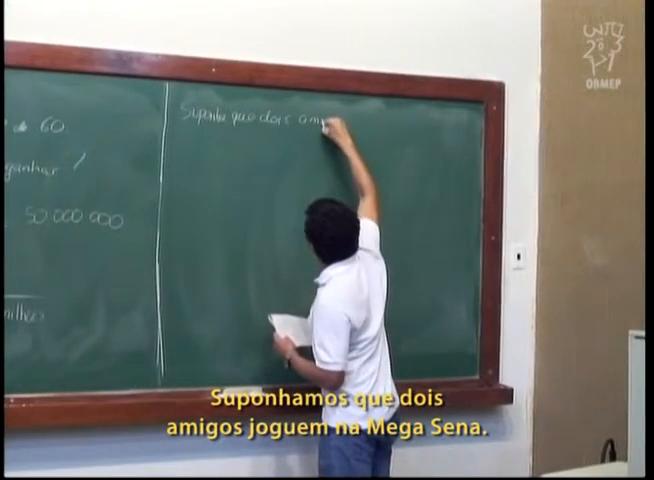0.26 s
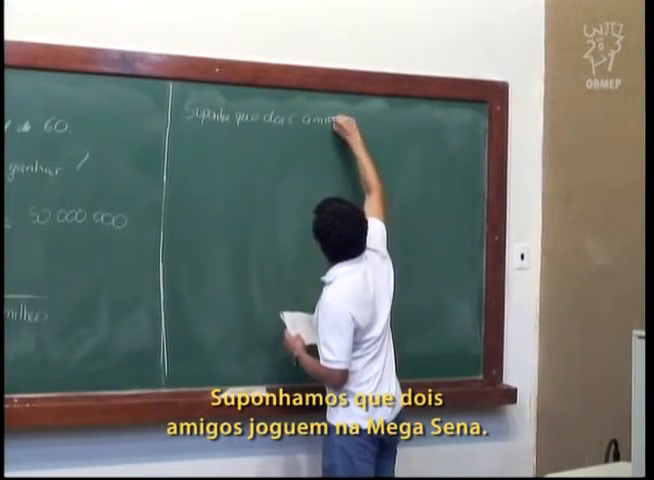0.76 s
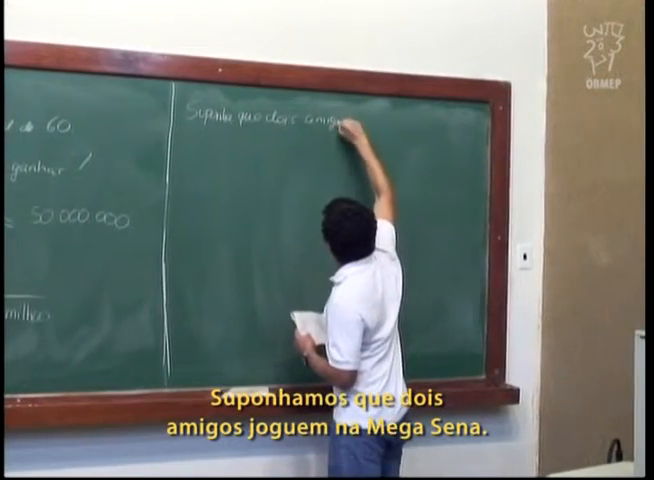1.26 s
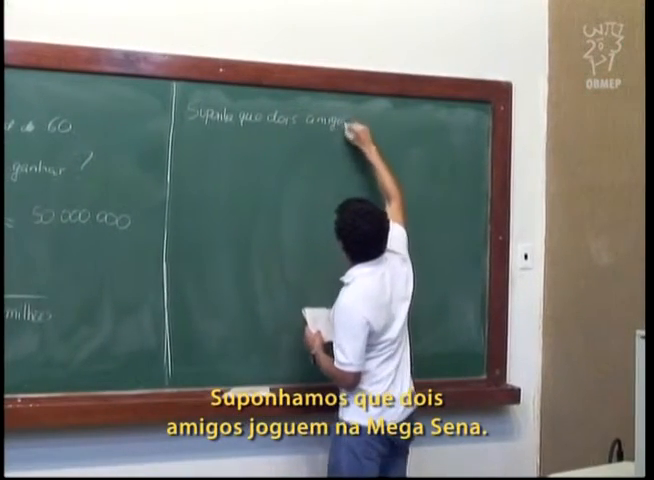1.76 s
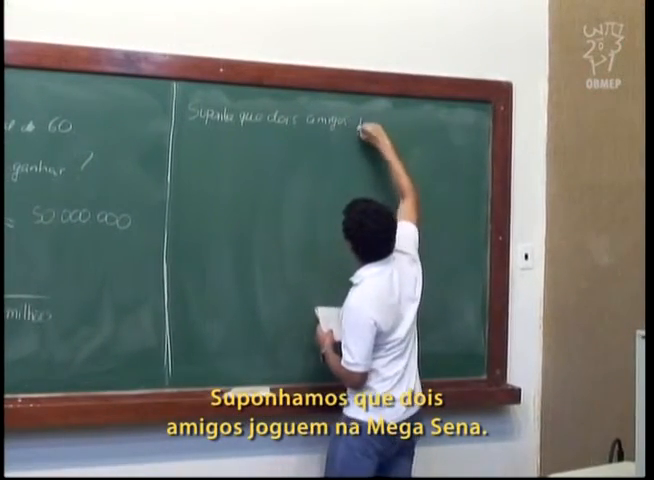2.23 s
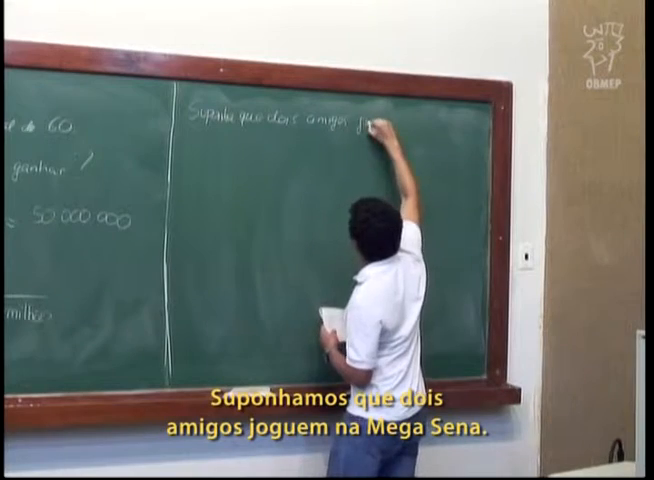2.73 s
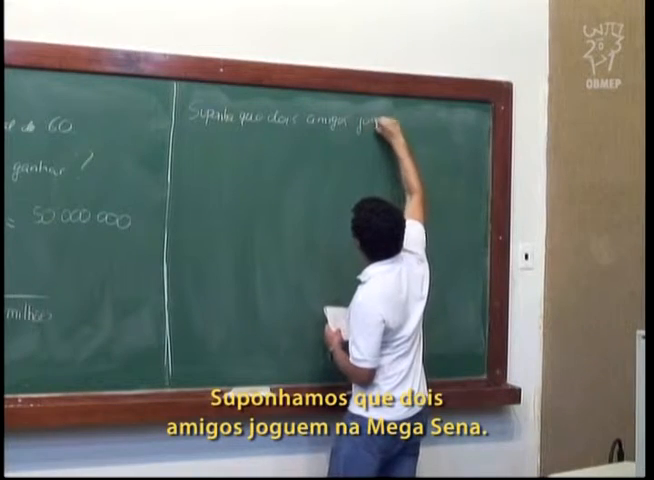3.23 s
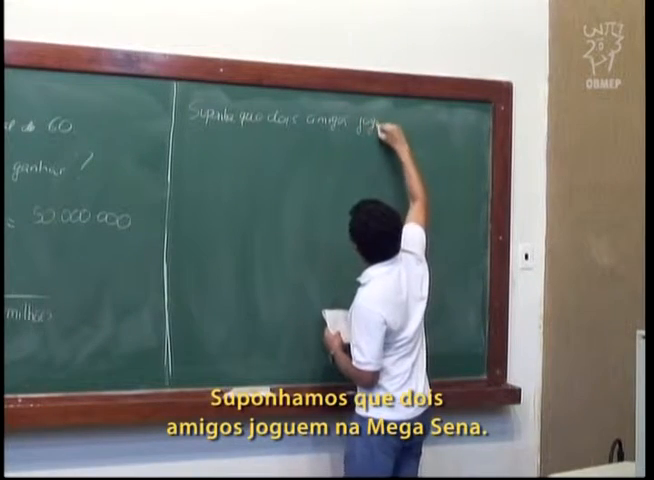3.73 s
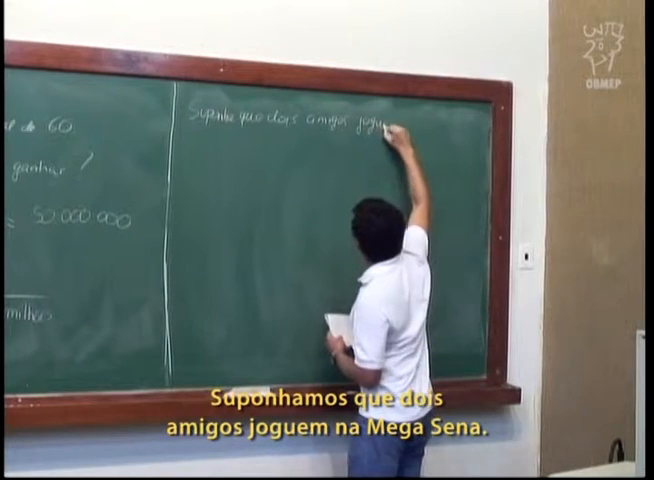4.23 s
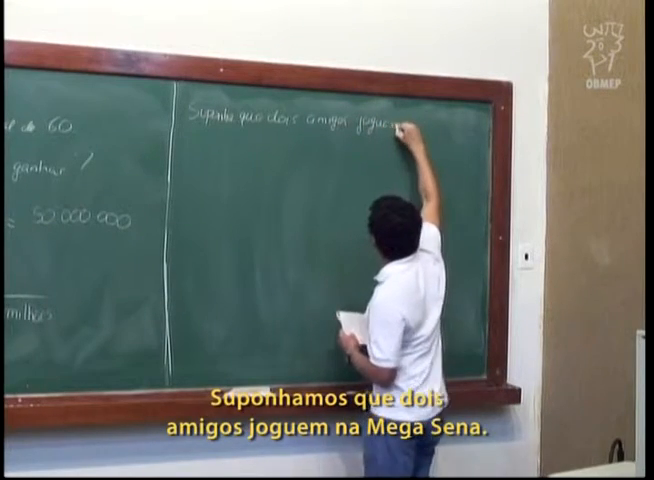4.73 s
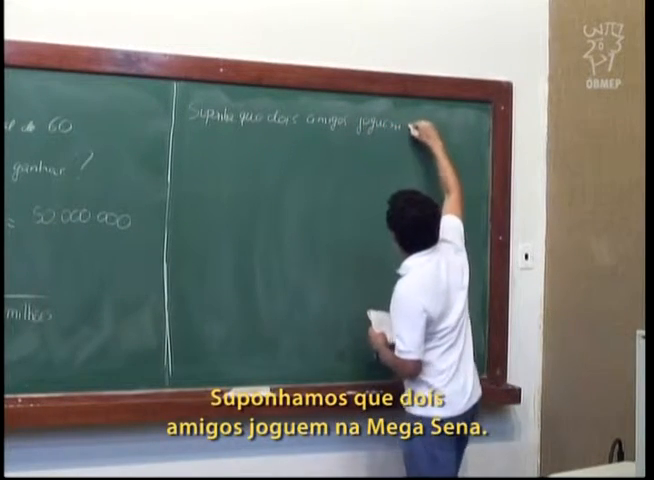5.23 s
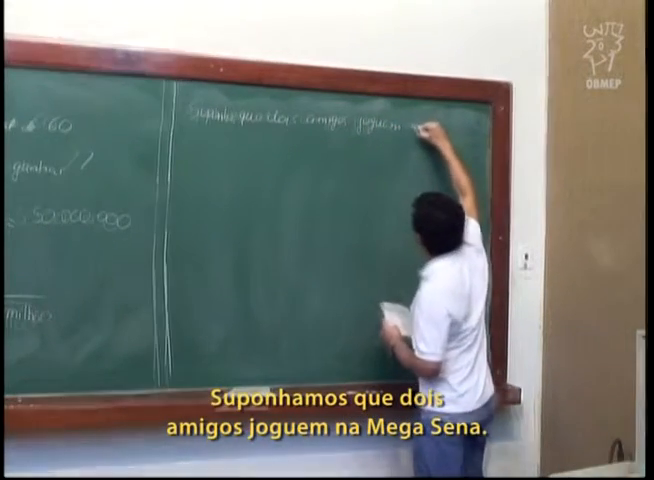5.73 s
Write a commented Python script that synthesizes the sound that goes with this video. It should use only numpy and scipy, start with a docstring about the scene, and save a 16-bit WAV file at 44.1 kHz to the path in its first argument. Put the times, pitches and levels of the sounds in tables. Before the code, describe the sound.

Chalk writes on a chalkboard for about six seconds in a quiet classroom, heard from a microphone facing the board. Dry, clicking taps mark the chalk landing, with faint gritty strokes between them. Two taps come at about 0.2 and 0.4 seconds, followed by a much softer one, then others near 1.2, 1.6 and 2 seconds. Brief scuffs sound around 1.1, 1.4 and 2.3 seconds as the chalk catches. The strongest tap lands at 2.4 seconds, with more at 2.6, 3 and 3.7. A scuff and three lighter taps fall between 4 and 4.5 seconds. Soft scraping continues to the end, broken by a duller knock at 5.3 seconds. A short room echo follows the writing. Underneath, a low building rumble, soft hiss, electrical hum and a very faint high whine stay steady throughout.

```python
"""A quiet classroom, the microphone facing a wall-mounted chalkboard. From the start there is the low
rumble of the building, hiss, mains hum and the thin whine of video equipment. Someone writes a few
words: each letter opens with a dry tap as the chalk rings the board, goes on in faint gritty sweeps
of the hand and often ends in a scuff as the chalk catches. The room echoes briefly behind them."""
import sys
import numpy as np
from scipy import signal
from scipy.fft import rfft, irfft, next_fast_len
from scipy.io import wavfile
from scipy.ndimage import uniform_filter1d

SR = 44100
rng = np.random.default_rng(int(sys.argv[2]) if len(sys.argv) > 2 else 0)


def inscribe(sig):
    """Save sig as 16-bit PCM at rate SR to the path in sys.argv[1].

    A 1-D sig is mono; a 2-D sig holds one channel per row.
    Samples are clipped to [-1, 1] before scaling.
    """
    pcm = np.round(np.clip(np.atleast_2d(sig).T, -1, 1) * 32767)
    wavfile.write(sys.argv[1], SR, pcm.astype(np.int16))


N = 264159
TIME = np.arange(N) / SR


def amp(db):
    """Decibels to gain."""
    return 10 ** (np.asarray(db) / 20)


def unit(x):
    """Scales to rms 1."""
    return x / np.sqrt(np.mean(x ** 2) + 1e-20)


def read(table, hz, column=1):
    """One column of a table along a log-frequency axis."""
    columns = np.transpose(table)
    return np.interp(np.log(hz + 1), np.log(columns[0] + 1), columns[column])


def add(mix, s, sound):
    """Lays a sound into the mix at s seconds."""
    part = mix[max(round(s * SR), 0):][:len(sound)]
    part += sound[:len(part)]


def colour(x, spectrum):
    """Filters by a (Hz, dB) spectrum."""
    size = next_fast_len(2 * len(x))
    gain = amp(read(spectrum, np.fft.rfftfreq(size, 1 / SR)))
    return irfft(rfft(x, size) * gain, size)[:len(x)]


def wander(rate_hz):
    """A smooth random drift of rms 1 that changes up to about rate_hz times a second."""
    hz = np.fft.rfftfreq(N, 1 / SR)
    return unit(irfft(rfft(rng.standard_normal(N)) * np.exp(-(hz / rate_hz) ** 2), N))


def tone(hz, db):
    """A steady sine of the given rms level."""
    return amp(db) * np.sqrt(2) * np.sin(2 * np.pi * (hz * TIME + rng.random()))


# The building, heard from indoors. Each row: frequency in Hz, relative level in dB.
BUILDING_RUMBLE = [(15, -51), (25, -16), (37, -11), (46, -0.5), (62, 2.5), (75, 6.5), (90, 6), (103, 0.5),
                   (120, -1), (135, 0.5), (152, -5), (175, -16.5), (260, -64), (500, -56)]
# Still air and microphone hiss. Each row: frequency in Hz, relative level in dB.
AIR_HISS = [(100, -24), (170, 4.5), (250, -0.5), (430, -8), (585, -6.5), (820, -12.5), (1300, -16.5),
            (2000, -19.5), (3400, -24.5), (5500, -28), (10000, -30), (15000, -30.5)]
# The mains. Each row: frequency in Hz, rms level in dB.
MAINS_HUM = [(90.5, -62), (119.7, -56.5)]
def room_tone():
    """Swelling rumble, even hiss, hum, and a line-scan whine with side tones one field rate apart."""
    line_hz, field_hz = 15734.3, 60
    rumble = unit(colour(rng.standard_normal(N), BUILDING_RUMBLE))
    rumble *= amp(-50.5 + 1.5 * wander(rate_hz=6.2))
    hiss = amp(-54.5) * unit(colour(rng.standard_normal(N), AIR_HISS))
    hum = sum(tone(hz, db) for hz, db in MAINS_HUM)
    whine = tone(line_hz, db=-73.5) + sum(tone(line_hz - k * field_hz, db=-86) for k in range(1, 7))
    return rumble + hiss + hum + whine


def grit(grains_per_s, clump_db):
    """Chalk crumbles in tiny uneven grains; clump_db bunches them as the tip sticks and slips."""
    grains = rng.standard_normal(N) * (rng.random(N) < grains_per_s / SR)
    return unit(grains * amp(clump_db * wander(rate_hz=77)))


def tip_wear(x, patchy_db):
    """The tip's facets wear and turn, so patches of its colour come and go."""
    bands = signal.stft(x, nperseg=256)[2]
    patches = uniform_filter1d(rng.standard_normal(bands.shape), size=5, axis=0)
    patches = uniform_filter1d(patches, size=18, axis=1)
    return unit(signal.istft(bands * amp(patchy_db * unit(patches)))[1][:N])


# Sweeps of the hand between turns or lifts. Each row: start in seconds, length in seconds,
# level in dB, then grinding and powder in dB relative to that level.
HAND_SWEEPS = [(0.01, 0.135, -68.5, 2.5, -4), (0.24, 0.084, -68, 2, -3), (0.587, 0.094, -62, 3, -2.5),
               (0.675, 0.13, -68, 8, -1), (0.799, 0.12, -61.5, 3.5, -4), (0.915, 0.15, -69.5, 2.5, 1),
               (1.024, 0.047, -66, 6, 1), (1.202, 0.077, -63, 5, -4), (1.283, 0.12, -68.5, 10.5, 2),
               (1.393, 0.042, -67.5, 10, -6), (1.598, 0.1, -64, 8, -1), (1.681, 0.087, -68.5, 4, 3),
               (1.998, 0.18, -63, -2, 0), (2.162, 0.078, -66.5, 3.5, 7), (2.23, 0.087, -71.5, 9, 9),
               (2.615, 0.098, -65.5, 1, 0), (2.7, 0.16, -70, 5, 5), (3.035, 0.1, -66, 4, -4),
               (3.128, 0.12, -71, 8, 5), (3.27, 0.15, -63.5, -0.5, 2.5), (3.407, 0.17, -69, 6, 4),
               (3.69, 0.11, -64.5, -2, -3), (3.788, 0.094, -64, 5.5, 0), (3.923, 0.093, -65, 2, -2),
               (4.02, 0.048, -65, 2.5, 0), (4.173, 0.11, -63.5, 3, -3), (4.278, 0.064, -63.5, 3, 0),
               (4.396, 0.053, -65.5, 3, 0), (4.572, 0.085, -67, 2, 0), (4.668, 0.075, -66.5, 7, 3),
               (4.755, 0.099, -67.5, 3.5, -1), (4.854, 0.057, -64, 4, 0), (4.934, 0.19, -68.5, 5, 0),
               (5.313, 0.115, -67.5, 10, 3), (5.413, 0.1, -68, 4, 5), (5.526, 0.1, -70.5, 7.5, 6),
               (5.625, 0.096, -69, 3, 7), (5.72, 0.135, -70.5, 13.5, 6), (5.845, 0.13, -68.5, 3, 4.5)]
# The sliding contact's three voices: board, stick, powder. Each row: frequency in Hz, gain in dB.
BOARD_GRIND = [(300, -21), (700, 11), (900, 3), (1200, 14), (1700, 7.5), (2600, 6.5), (3600, 6), (4600, -1),
               (6200, -22), (8000, -10), (12000, -24)]
STICK_SING = [(4000, -11), (6600, 1), (7400, 10), (8000, 3.5), (8600, 5.5), (9600, 0), (11000, -14.5),
              (14000, -7)]
POWDER_HISS = [(8000, -13.5), (11000, -1), (12200, 4.5), (13000, 7), (13700, 6), (14500, 10.5), (15600, 2)]
# How a sweep drives those three, in order. Each row: power of hand speed, start-to-end gain in dB.
SWEEP_RESPONSE = [(0.5, -2), (0.6, 1), (0.6, 3)]
def chalk_sweeps():
    """The hand speeds up, then turns or lifts; grains grind the board, ring the stick, hiss as powder."""
    lift_gap_s, lift_at, release_s = 0.025, 0.89, 0.0045
    levels = np.zeros((3, N))
    next_starts = [row[0] for row in HAND_SWEEPS[1:]] + [np.inf]
    for (s, length, db, grind_db, powder_db), next_s in zip(HAND_SWEEPS, next_starts):
        along = np.linspace(0, 1, round(length * SR), endpoint=False)
        # before a longer gap the chalk leaves the board still moving
        share_done = lift_at if next_s - s - length > lift_gap_s else 1
        speed = np.sin(np.pi * (share_done * along) ** 0.74)  # fastest before the middle
        touching = np.minimum((1 - along) * length / release_s, 1)
        for level, own_db, (power, tilt_db) in zip(levels, (grind_db, 0, powder_db), SWEEP_RESPONSE):
            add(level, s, touching * speed ** power * amp(db + own_db + tilt_db * (along - 0.5)))
    finger_pressure = amp(0.6 * wander(rate_hz=25))
    grains = grit(grains_per_s=9000, clump_db=0)
    voices = [colour(tip_wear(grains, patchy_db=3.5), spectrum)
              for spectrum in (BOARD_GRIND, STICK_SING, POWDER_HISS)]
    return finger_pressure * (levels * voices).sum(axis=0)


def ring(modes, t, sustain, weights_db, pitches):
    """Damped modes set going by a blow: real part for a push, imaginary for a kick."""
    hz, db, t60 = np.transpose(modes)
    height = amp((db + weights_db)[:, None] - 60 * t / (t60[:, None] * sustain))
    return (height * np.exp(2j * np.pi * (hz * pitches)[:, None] * t)).sum(axis=0)


def crunch(t, crush_db, decay_s):
    """The tip lands with one kick and crushes a few grains after it."""
    crumbs = rng.standard_normal(len(t)) * t * np.exp(-t / decay_s)
    return (t == 0) + amp(crush_db) * crumbs / np.linalg.norm(crumbs)


def disperse(x, lag_ms):
    """Bending waves run faster the higher they are; lag_ms is their travel time at 1 kHz."""
    khz = np.fft.rfftfreq(len(x), 1 / SR) / 1000
    fade = np.cos(np.linspace(0, np.pi / 2, len(x))) ** 2
    return fade * irfft(rfft(x) * np.exp(-4j * np.pi * lag_ms * np.sqrt(khz)), len(x))


def echoes(x, table, delay_s, size):
    """Dense reflections of x that begin after a delay; each band has its own energy and decay."""
    hz, t, bands = signal.stft(rng.standard_normal(size), SR, nperseg=128)
    decay_rate = np.log(1000) / read(table, hz, column=2)[:, None]
    height = amp(read(table, hz))[:, None] * np.sqrt(2 * decay_rate / SR)
    tail = signal.istft(bands * height * np.exp(-decay_rate * t), SR)[1]
    response = np.concatenate([np.zeros(round(delay_s * SR)), tail])[:size]
    return signal.fftconvolve(x, response)[:len(x)]


# The chalk lands. Each row: start in seconds, force in dB, contact time in ms, ring-time factor,
# deep mode in dB, hollow mode in dB, knock pitch factor, bright mode in dB, its pitch factor,
# click in dB, its pitch factor.
CHALK_TAPS = [(0.2225, -2.5, 0.036, 1.03, 9.5, 1.5, 1.115, -0.5, 1.11, 5.5, 1.01),
              (0.4277, 0, 0.033, 0.7, 7, -2, 1.155, -7, 1.03, 4, 1.06),
              (0.5283, -15.5, 0.031, 1, -7.6, -6, 1.08, -6, 1.06, 1, 0.99),
              (1.1695, -3, 0.048, 0.75, 12, 0.5, 1.06, 3, 1.09, -4, 0.86),
              (1.5633, -2, 0.051, 0.54, 1.5, 0, 1.17, -3, 1, -5, 0.87),
              (1.9576, 0.95, 0.051, 0.59, -12, -1.5, 1.17, -1, 1.42, -5.5, 1),
              (2.4367, 9, 0.054, 0.31, -12, 2.5, 1.32, 3.5, 1.03, 3.5, 0.92),
              (2.5914, -0.5, 0.04, 0.54, 2.2, 4.5, 1.16, -3.5, 0.98, 2, 1.1),
              (2.9783, -3.5, 0.029, 0.97, -6, 3, 1.06, -2.1, 0.99, 1.5, 1.02),
              (3.6604, -0.4, 0.031, 0.95, 8, 3, 1.06, -0.5, 0.99, 1, 1.08),
              (4.1258, -6.5, 0.041, 0.93, -7, -15, 1.03, 4, 1.05, -3, 0.93),
              (4.3882, -9.5, 0.021, 1.08, -15, -1, 1.01, 10, 0.92, 6.5, 0.98),
              (4.5348, -7.5, 0.028, 1.07, -4, -13, 1.005, 3.5, 1.01, 5.5, 0.98),
              (5.2807, -6, 0.052, 0.88, 21.5, -10, 1.02, 3, 0.95, -10, 0.81)]
# What a blow sets ringing: the board's deep and hollow modes, two modes of the knock with a faint
# lingering ring of the room between them, and a bright mode; then the hand-held stick's modes.
# Each row: frequency in Hz, level in dB, seconds to fall 60 dB.
BLOW_MODES = [(510, -41.5, 0.026), (802, -27, 0.061), (1159, -11.5, 0.016), (1360, -49, .2),
              (1277, -12.5, 0.0094), (1957, -16, 0.012)]
STICK_MODES = [(3435, -17.5, 0.004), (4120, -27, 0.0021), (7880, -29.5, 0.0035), (9300, -43, 0.0031),
               (13300, -53, 0.0051)]
# Bending waves thrown back by the frame. Each row: frequency in Hz, level in dB, seconds to fall 60 dB.
FRAME_ECHO = [(200, -8.5, 0.13), (700, -6.5, 0.024), (1360, -11, 0.076), (2200, -16.5, 0.0068),
              (4030, -12, 0.02), (9000, -10.5, 0.0097), (16000, -30, 0.033)]
# The taps carry little bass. Each row: frequency in Hz, gain in dB.
TAP_LOW_CUT = [(25, -12), (70, -22), (150, -1.5), (260, -0.5)]
def chalk_taps():
    """A blow rings the board and the stick clicks; returns the sound toward the mic and into the room."""
    ahead, around = np.zeros((2, N))
    t = np.arange(8192) / SR
    for (s, force_db, contact_ms, sustain, deep_db, hollow_db, knock_pitch,
         bright_db, bright_pitch, click_db, click_pitch) in CHALK_TAPS:
        contact = 1000 * t / contact_ms
        push = contact ** 2 * np.exp(-contact)  # a longer contact makes a duller knock
        # the struck spot favours its own modes; over the whole board they blur together
        pitches = [1, 1, knock_pitch, 1, knock_pitch]
        spot = ring(BLOW_MODES, t, sustain, [deep_db, hollow_db, 0, 0, 0, bright_db],
                    pitches + [bright_pitch])
        whole = amp(3) * ring(BLOW_MODES, t, 0.4 * sustain, 0, pitches + [1])
        spot_knock, whole_knock = (signal.fftconvolve(modes.real, push / push.sum())[:len(t)]
                                   for modes in (spot, whole))
        # the grip shifts the stick's two lowest modes
        stick = ring(STICK_MODES, t, sustain, click_db, [click_pitch, click_pitch, 1, 1, 1]).imag
        click = signal.fftconvolve(stick, crunch(t, crush_db=-5, decay_s=0.00072))[:len(t)]
        near = -amp(force_db) * (spot_knock + click)
        far = -amp(force_db) * (whole_knock + amp(-1) * stick)
        scattered = echoes(far, FRAME_ECHO, delay_s=0.00274, size=4096)
        add(ahead, s, disperse(near, lag_ms=0.24) + scattered)
        add(around, s, far + scattered)
    return colour(ahead, TAP_LOW_CUT), colour(around, TAP_LOW_CUT)


# The chalk catches in a turn or flicks off the board. Each row: hardest point in seconds,
# level in dB, build-up in seconds, rasp in dB relative to that level.
CHALK_SCUFFS = [(0.845, -61, 0.0092, -3), (1.062, -46.5, 0.015, -8.5), (1.376, -53, 0.031, -15),
                (1.434, -44.5, 0.021, -16), (1.768, -56.5, .012, 0), (2.204, -52, 0.017, -10),
                (2.307, -47, 0.018, -13), (2.85, -53.5, 0.021, -14), (3.32, -57, 0.084, -11),
                (4.063, -48.5, 0.0083, -7.5), (4.714, -53, 0.014, -7), (4.926, -57.5, 0.077, -13),
                (5.051, -56.5, 0.14, -18), (5.4, -55.5, 0.075, 0), (5.578, -51.5, 0.014, -21),
                (5.765, -57, .025, -7), (5.84, -55.5, 0.033, -22)]
# The dull drag and the sharp edge's rasp. Each row: frequency in Hz, gain in dB.
SCUFF_DRAG = [(250, -14), (550, 11.5), (800, 5), (1200, 15.5), (1700, 5.5), (2500, 2), (3700, 0.5),
              (5500, -33), (9000, -21), (16000, -22)]
EDGE_RASP = [(1500, -14), (3400, -2), (5300, 4), (6300, 1), (7500, 2.5), (9500, -9), (15000, -11)]
def chalk_scuffs():
    """Coarse slips build up against the board and stop as the chalk lets go; a sharp edge rasps."""
    release_s = 0.0057
    drag, edge = np.zeros((2, N))
    for s, db, build_s, rasp_db in CHALK_SCUFFS:
        from_peak = np.maximum((s - TIME) / build_s, (TIME - s) / release_s)
        swell = amp(db) * np.exp(-from_peak ** 2)
        drag += swell
        edge += swell * amp(rasp_db)
    slips = grit(grains_per_s=4500, clump_db=1.5)
    return colour(drag * slips, SCUFF_DRAG) + colour(edge * slips, EDGE_RASP)


# The classroom's echo. Each row: frequency in Hz, level in dB, seconds to fall 60 dB.
CLASSROOM_ECHO = [(150, -23.5, 0.28), (497, -7.5, 0.64), (890, -18, 0.51), (1450, -13, 0.46),
                  (2190, -19.5, 0.42), (3720, -22, 0.36), (7500, -13.5, 0.3), (16000, -28, .12)]
# Single bounces off floor and walls. Each row: delay at the microphone in seconds, level in dB.
WALL_BOUNCES = [(.0078, -23), (0.0134, -24), (0.026, -27.5)]
def classroom(x):
    """Sound that takes the long way to the microphone: three bounces and a diffuse tail."""
    room = echoes(x, CLASSROOM_ECHO, delay_s=0.0061, size=32768)
    for delay_s, db in WALL_BOUNCES:
        add(room, delay_s, amp(db) * x)
    return room


# Stereo balance: a little louder on the left, nearer the centre in the treble.
# Each row: frequency in Hz, left minus right in dB.
STEREO_BALANCE = [(100, 2.5), (1200, 2.5), (5000, 2), (10000, 1), (14000, 1.6)]
def scene():
    """Room tone, the writing and its echo, heard from one spot."""
    background = room_tone()
    sweeps = chalk_sweeps()
    taps_ahead, taps_around = chalk_taps()
    sliding = sweeps + chalk_scuffs()
    sound = background + sliding + taps_ahead + classroom(taps_around + sliding)
    return np.array([colour(sound, [(hz, side * db / 2) for hz, db in STEREO_BALANCE])
                     for side in (1, -1)])


def record(dry):
    """The recorder clips any peak that overloads it, then cuts the highest treble."""
    clipped = np.clip(dry, -0.97, 0.97)
    lowpass = signal.firwin(601, cutoff=15950, window=("kaiser", 9), fs=SR)
    return signal.oaconvolve(clipped, lowpass[None], "same")


dry = scene()
out = record(dry)
inscribe(out)
```